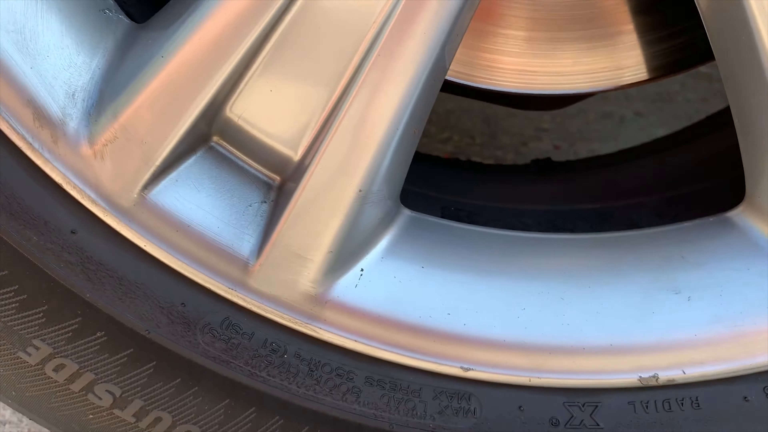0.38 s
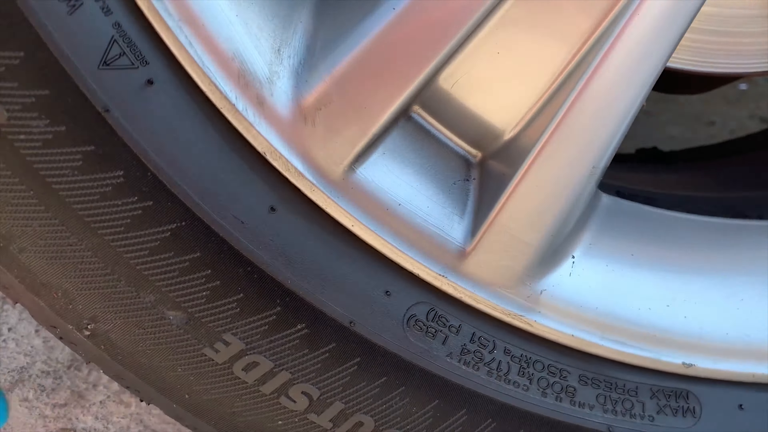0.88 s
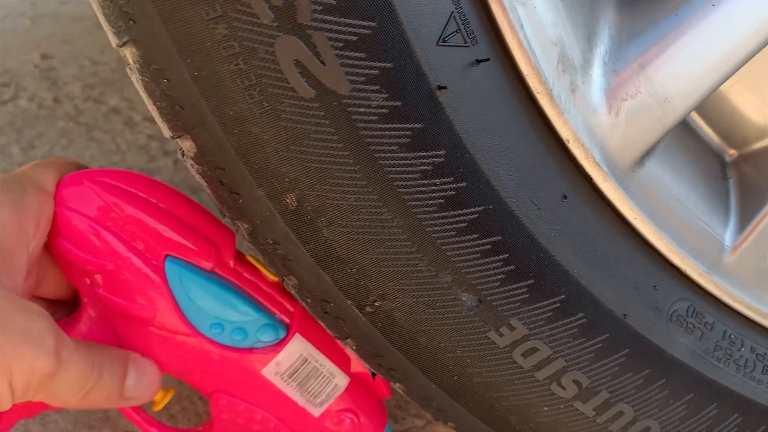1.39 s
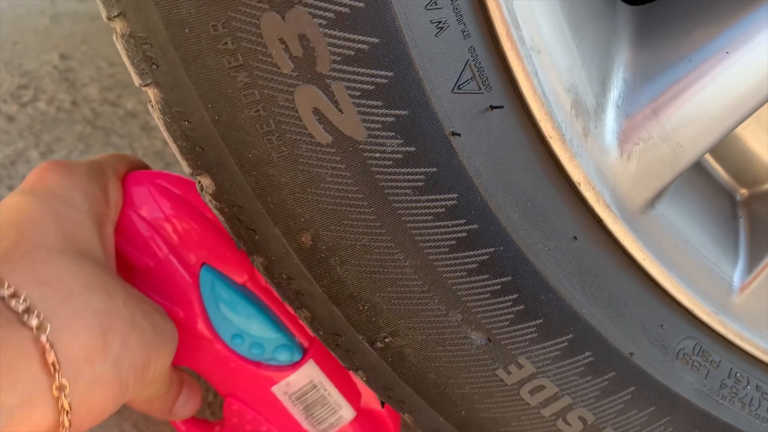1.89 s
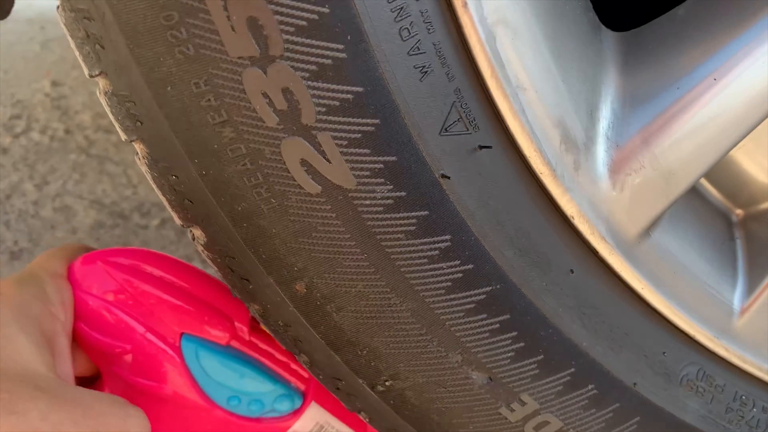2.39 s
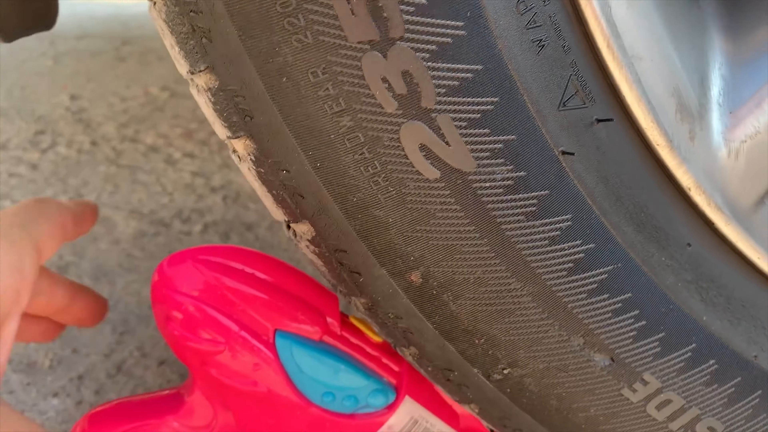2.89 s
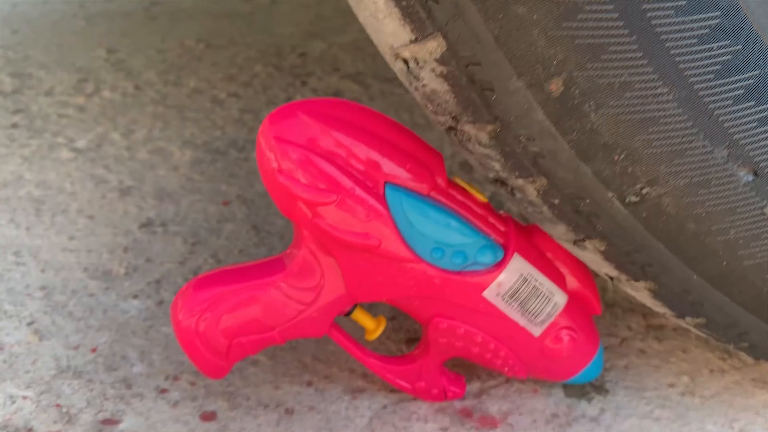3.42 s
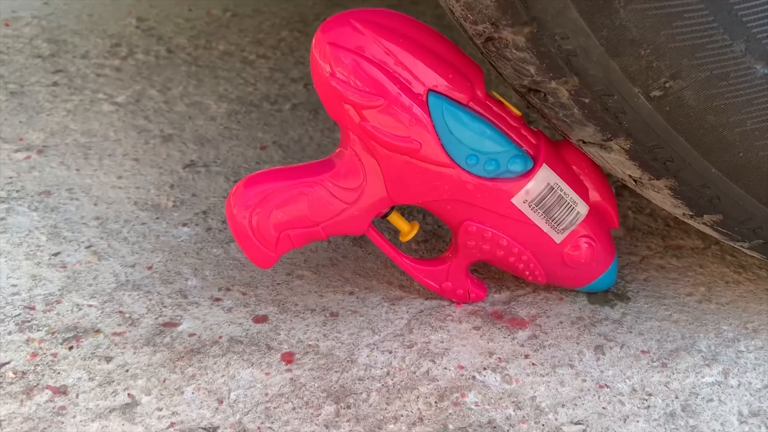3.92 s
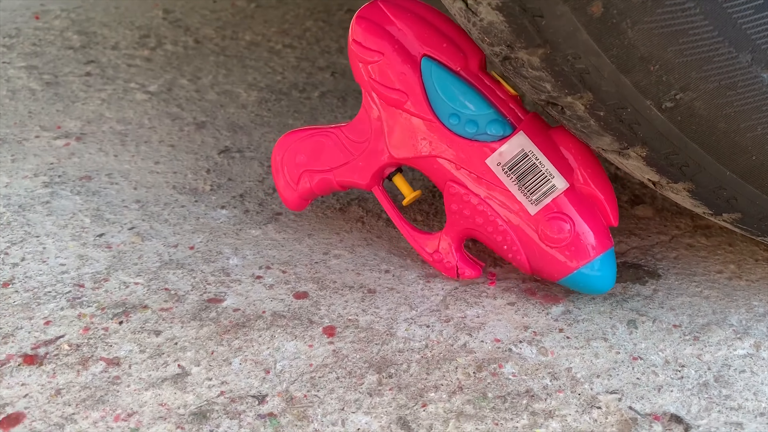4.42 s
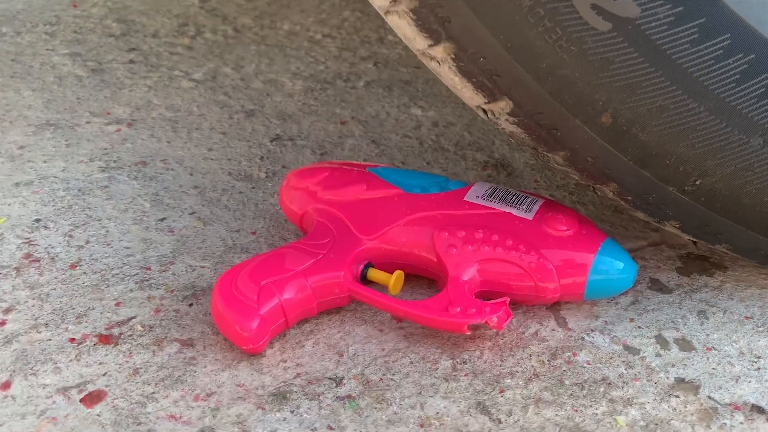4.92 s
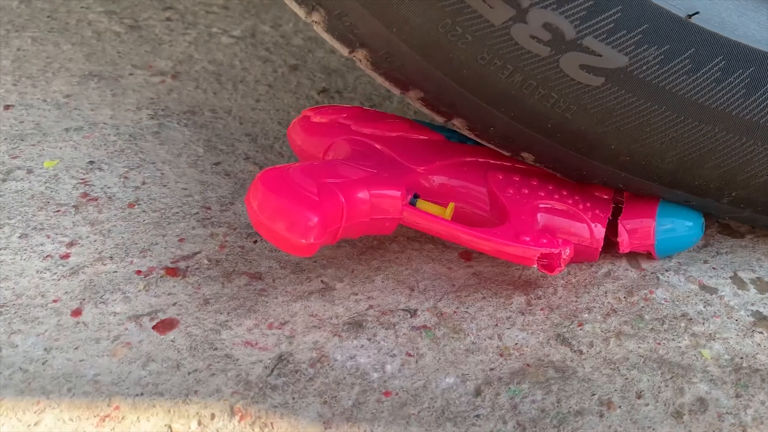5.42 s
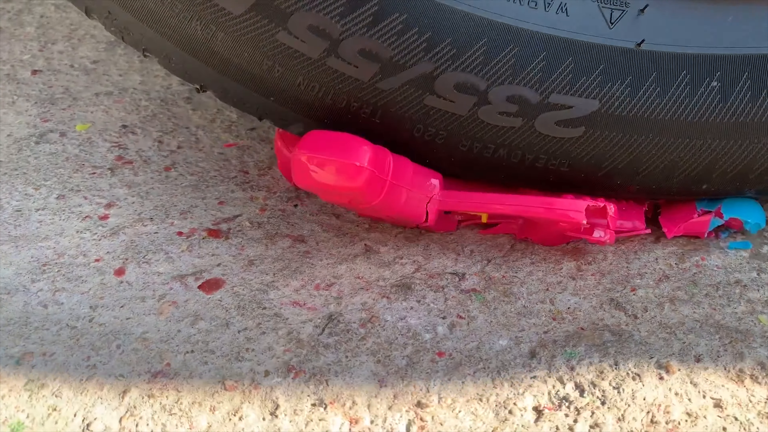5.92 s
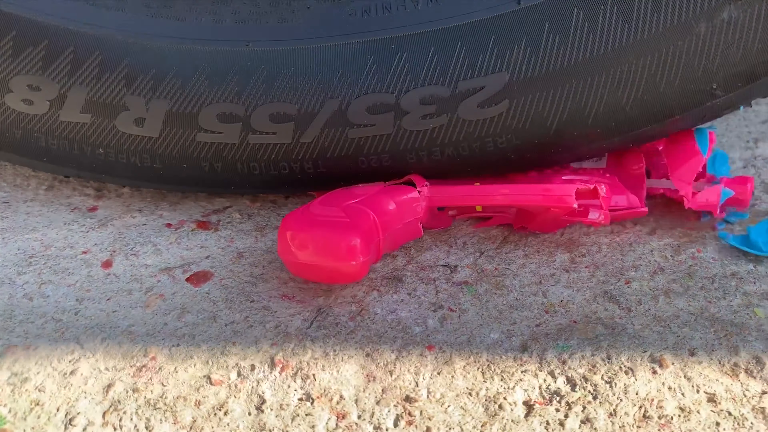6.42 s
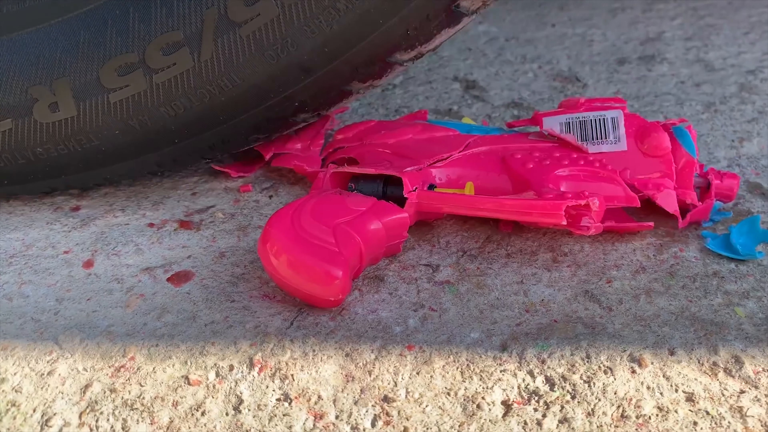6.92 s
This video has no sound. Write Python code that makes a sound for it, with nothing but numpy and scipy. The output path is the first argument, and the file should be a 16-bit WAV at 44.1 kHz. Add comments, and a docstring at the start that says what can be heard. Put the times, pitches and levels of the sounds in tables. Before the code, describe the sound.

A car tyre nudges a hollow hard plastic toy on concrete with sharp cracks, pauses, then rolls over it in a dense crunch.

```python
"""A car idles softly while insects hiss far off. Its tyre pushes a hollow, hard plastic toy over concrete:
the shell slips and cracks, bursts into louder cracks at 1 to 2.4 s, and then lies nearly quiet. From 4 s the
tyre rolls across it with ringing and knocks, then a dense crunch flattens it, thinning out near 7 s.
Shaped noise makes cracks, scrape, rumble and air; sines make shards, chips, knocks, thuds, rings and whines.
Two close microphone ports listen."""
import sys
import numpy as np
from scipy import signal
from scipy.fft import rfft, irfft, next_fast_len
from scipy.io import wavfile
from scipy.ndimage import map_coordinates

SR = 44100
rng = np.random.default_rng(int(sys.argv[2]) if len(sys.argv) > 2 else 0)


def level_to_linear(level):
    """Convert decibel levels to linear amplitude factors, elementwise."""
    exponent = np.asarray(level, float) / 20
    return 10 ** exponent


def file_out(sig):
    """Save sig as 16-bit WAV at sys.argv[1]."""
    # one column per channel
    cols = np.atleast_2d(sig).T
    # limit, then scale
    lim = np.clip(cols, -1, 1)
    pcm = np.round(lim * 32767).astype(np.int16)
    wavfile.write(sys.argv[1], SR, pcm)


N = 311346

# Spectrum of idle and insects. Each row: frequency in Hz, relative level in dB.
AIR_SPECTRUM = [(60, 2), (150, 2.5), (420, -7), (520, -25), (1200, -23), (1800, -30.5), (2500, -12.5),
                (3900, -26), (5000, -5), (6500, -15), (8500, -17), (11000, -41), (16300, -43)]
# Steady whines of the idling car. Each row: frequency in Hz, relative level in dB.
WHINES = [(1270, -65.5), (5001, -61), (15003, -61)]
# Left-right likeness of near and far noise. Each row: frequency in Hz, correlation from 0 to 1.
NEAR_ALIKE = [(30, 0.17), (200, 1), (900, 0.99), (1300, 0.32), (6000, 0.46), (8500, 0.99)]
FAR_ALIKE = [(60, 0.079), (400, 0.98), (1500, 0.15), (6000, 0.15), (9000, 1)]
# How hard the tyre presses the toy along the grit. Each row: time in seconds, grinding level in dB.
PRESSURE = [(0, -33.5), (0.1, -43.5), (0.27, -53.5), (0.32, -63), (2.58, -61), (2.65, -44.5), (2.76, -68),
            (3.7, -60.5), (3.97, -45.5), (4.12, -50.5), (4.35, -47.5), (4.62, -42.5), (5.12, -41),
            (5.19, -58), (5.27, -31.5), (5.8, -30), (6.38, -29), (6.45, -38), (6.75, -57), (7.06, -55)]
# Spectrum of plastic on grit. Each row: frequency in Hz, relative level in dB.
GRIND_SPECTRUM = [(200, -10), (600, 4.5), (2000, 6), (3800, 5), (6500, 7), (9000, 3), (14000, 3.5),
                  (16300, -16)]
# Spectrum of the tyre's rumble. Each row: frequency in Hz, relative level in dB.
RUMBLE_SPECTRUM = [(30, -4.5), (170, -0.5), (208, 4.5), (240, -13.5), (450, -11), (700, -44.5)]
# Thuds of the tyre wall when load lets go. Each row: peak in seconds, relative level in dB, pitch in Hz.
THUDS = [(0.03, -34.5, 51), (1.09, -16, 164.5), (1.229, -28, 189.5), (1.2908, -18, 218), (1.47, -35, 48.3),
         (1.507, -37.5, 90.2), (1.644, -31.5, 53.8), (1.697, -28, 61.4), (1.768, -26.5, 101),
         (2.295, -24.5, 202.4), (1.975, -24.5, 43.7), (2.394, -26.5, 224), (4.018, -30, 91),
         (4.739, -17, 110), (5.28, -29, 50.5), (5.494, -25, 38), (5.513, -22.5, 215), (5.608, -23.5, 211),
         (6.006, -25.5, 204), (6.262, -28, 187), (6.399, -37, 45)]
# Shell and rubber ringing on after a knock or slip.
# Each row: start in seconds, end in seconds, mid pitch in Hz, relative level in dB.
RINGS = [(0.017, 0.124, 585, -34.5), (1.1, 1.227, 186, -25.5), (3.95, 4.08, 174, -37.5),
         (4.05, 4.245, 196.8, -37), (3.994, 4.1, 635, -32.5), (4.332, 4.406, 652, -31),
         (4.404, 4.441, 680, -33.5), (4.508, 4.573, 676, -28), (4.575, 4.693, 683, -32.5),
         (4.597, 4.67, 1088, -27.5), (4.724, 4.83, 112.6, -25), (4.799, 4.904, 636.5, -15),
         (4.913, 4.955, 650, -11), (4.952, 5.037, 619, -17.5), (5.046, 5.09, 555, -17.5),
         (5.078, 5.182, 570, -21), (5.269, 5.326, 417, -25), (5.3, 5.59, 474.5, -33.5),
         (5.466, 5.556, 448, -21), (6.276, 6.36, 1465, -28.5)]
# Modes of such a ring; the scrape's cavity shares the multiples. Each row: pitch multiple, level in dB.
RING_MODES = [(1, 1), (1.65, -21), (3.0, -27)]
# Cracks of the shell. Each row: peak in seconds, relative treble snap in dB, relative body in dB.
CRACKS = [(0.035, -35, -23.5), (0.062, -47, -26.5), (0.1803, -37, -37), (0.2506, -35, -40),
          (1.088, -6, -16), (1.1088, -15, -16), (1.1267, -12.5, -23.5), (1.135, -17.5, -15.5),
          (1.1506, -11.5, -13), (1.162, -10, -14), (1.226, -39, -30), (1.2651, -20, -19), (1.269, -20, -56),
          (1.283, -15, -20), (1.2887, -6.5, -14.5), (1.538, -21.5, -31.5), (1.6893, -38.5, -29.5),
          (1.725, -25, -23), (1.7634, -6.5, -12.5), (1.792, -33, -27), (1.8076, -4.5, -12.5),
          (1.9197, -5, -19.5), (1.9322, -17.5, -25.5), (1.941, -14.5, -11.5), (1.9487, -5.5, -15),
          (2.005, -42, -30), (2.0546, -23, -22), (2.0756, -28, -12), (2.085, -37.5, -26),
          (2.097, -16.5, -23.5), (2.1386, -14.5, -8.5), (2.1527, -29.5, -29), (2.3258, -7.5, -14.5),
          (2.3902, -17.5, -19.5), (2.402, -21, -59), (2.41, -27.5, -48), (2.629, -50, -35.5),
          (2.7167, -45, -41), (3.772, -77, -61), (4.005, -7.5, -13.5), (4.009, -11, -39),
          (4.019, -25.5, -19), (4.144, -75, -44), (4.209, -71, -40), (4.2666, -44, -38), (4.3062, -21, -25),
          (4.3284, -23.5, -22), (4.3381, -12.5, -20.5), (4.4062, -23.5, -31.5), (4.4971, -31, -34),
          (4.51, -25.5, -20), (4.5404, -31, -25.5), (4.561, -29, -29.5), (4.585, -15, -16),
          (4.691, -48, -44), (4.7229, -6, -11), (4.7744, -32, -27), (4.803, -31, -17), (4.8167, -19, -13.5),
          (4.836, -17, -12), (4.912, -32.5, -28), (4.9481, -22.5, -12.5), (4.994, -37.5, -21.5),
          (5.018, -25.5, -17.5), (5.0315, -21, -15.5), (5.0694, -22, -14), (5.0992, -23.5, -17),
          (5.12, -42.5, -29.5), (5.214, -17, -43), (5.234, -28, -22), (5.2496, -7.5, -11),
          (5.2611, -7.5, -11), (5.285, -22.5, -23), (5.2973, -16, -13.5), (5.31, -18.5, -25),
          (5.3236, -15.5, -21), (5.339, -15.5, -28), (5.348, -15.5, -35), (5.377, -12, -36),
          (5.399, -16, -49), (5.4185, -13, -47), (5.432, -15.5, -28), (5.448, -19.5, -53),
          (5.464, -12, -14), (5.471, -13.5, -16), (5.509, -15.5, -15), (5.5187, -13, -17.5),
          (5.5443, -13, -50), (5.563, -11.5, -11), (5.587, -15, -21.5), (5.622, -10, -17.5),
          (5.634, -16.5, -21), (5.6504, -16, -25), (5.6627, -15, -31.5), (5.679, -23.5, -10.5),
          (5.693, -12, -16.5), (5.7145, -12.5, -22), (5.729, -11.5, -19.5), (5.7454, -12.5, -19.5),
          (5.771, -17, -13.5), (5.785, -12.5, -17.5), (5.7911, -15, -57), (5.8108, -13, -26),
          (5.823, -14.5, -12), (5.839, -10.5, -19), (5.852, -18, -18.5), (5.868, -16, -19),
          (5.879, -12, -13), (5.898, -13.5, -14), (5.9307, -8.5, -14), (5.963, -9.5, -16),
          (5.979, -10, -18.5), (6.013, -10.5, -14.5), (6.053, -24.5, -36), (6.073, -6.5, -15),
          (6.1, -12, -19.5), (6.1274, -10.5, -19), (6.1348, -14, -33), (6.157, -10, -12),
          (6.1804, -13, -15.5), (6.2114, -14, -19), (6.2204, -10.5, -20), (6.2876, -8.5, -14.5),
          (6.3308, -13, -23), (6.3376, -9, -17), (6.365, -15.5, -9.5), (6.3788, -20, -12.5),
          (6.403, -21, -31), (6.4217, -12.5, -18), (6.445, -21, -21), (6.4678, -11, -21),
          (6.491, -15, -8.5), (6.502, -14.5, -25.5), (6.5083, -7, -17), (6.5177, -31, -17),
          (6.542, -18.5, -32), (6.553, -11, -13), (6.558, -16, -34), (6.575, -24, -28.5),
          (6.5891, -15.5, -14.5), (6.597, -12.5, -36), (6.6083, -27, -22.5), (6.6205, -18, -16.5),
          (6.646, -30, -45), (6.6658, -14, -17.5), (6.703, -10, -20), (6.7146, -40.5, -19.5),
          (6.733, -19, -20), (6.741, -22.5, -34), (6.7585, -13, -17), (6.7892, -13.5, -15.5),
          (6.807, -26, -28), (6.8378, -29, -16.5), (6.857, -18, -25.5), (6.883, -13.5, -18.5),
          (6.919, -29.5, -23.5), (6.956, -29.5, -32.5), (6.991, -28, -32.5)]
# Bands of a crack. Each row: low edge in Hz, high edge in Hz, typical t60 in seconds, echo over burst in dB.
CRACK_BANDS = [(6410, 13850, 0.012, -23.5), (2660, 3490, 0.038, -12.5), (830, 1600, 0.036, -23.5),
               (233, 1290, 0.043, -23)]
# Knocks of the hollow toy on the ground. Each row: peak in seconds, relative level in dB, cavity pitch in Hz.
KNOCKS = [(0.035, -22.5, 577), (0.079, -22.5, 610), (1.089, -15, 525), (1.112, -19.5, 630),
          (1.152, -15, 584), (1.268, -28.5, 743), (1.297, -19.5, 674), (1.726, -23.5, 650),
          (1.766, -21.5, 650), (1.958, -24, 570), (2.009, -21.5, 681), (2.1, -18, 770), (2.328, -24, 653),
          (3.065, -47, 704), (4.028, -22.5, 640), (4.512, -13, 657), (4.726, -15.5, 613),
          (4.778, -13.5, 620), (4.819, -2.5, 587), (4.92, -7, 617), (4.953, -4, 585), (5.034, -4.5, 540),
          (5.08, -6.5, 570), (5.11, -10, 520), (5.567, -8.5, 650), (5.883, -19.5, 550), (6.096, -16, 740),
          (6.232, -16, 710), (6.367, -16, 627)]
# Modes of the cavity. Each row: pitch multiple, level in dB, t60 in seconds.
CAVITY_MODES = [(1, -2, 0.02), (1.029, -13, 0.05), (1.65, -14, 0.015)]
# How much louder the left port hears the middle range. Each row: time in seconds, lean in dB.
LEAN = [(0, 3.5), (4.2, 6), (5, 9.8), (5.4, 0.63)]
# Where that lean acts. Each row: frequency in Hz, share from 0 to 1.
LEAN_SHAPE = [(350, 0.38), (1300, 1), (2200, 0.24), (5000, 1), (8500, 0.014)]

PORT_LAG_S = 10 / SR
LEAD_S = 0.006  # swell kept ahead of each peak
LUMPS_DB, KNOCK_SCATTER_DB = 4.5, 2
# debris rattling after a crack: level over the crack's body, before its rise
RATTLE_DB, RATTLE_RISE_S, RATTLE_T60_S = -22, 0.0072, 0.25
# chips and snaps gain on the scrape as pressure rises
SNAPS_DB_PER_DB = 0.44
# the tyre shudders after a thud or knock: level over each, before the rise
SHUDDER_THUD_DB, SHUDDER_KNOCK_DB, SHUDDER_RISE_S, SHUDDER_T60_S = -10.5, -32, 0.014, 0.58
# rumble under steady load, before the lumps: level at a pressure of -46.5 dB, growth with pressure
RUMBLE_DB, RUMBLE_DB_PER_DB = -52, 0.6
# base of a crack's rise at a pressure of -52.5 dB; squeezed shell tears more slowly
TEAR_S, TEAR_DB_PER_DB = 0.0003, 0.3
# cavity resonance of the scrape: the dB is what each mode adds to a flat gain of 1
CAVITY_HZ, CAVITY_WIDTH_HZ, CAVITY_DB = 650, 44, 2


def unit(x):
    """Scaled to rms 1."""
    return x / np.sqrt(np.mean(x ** 2) + 1e-20)


def along(points, hz):
    """Interpolates (Hz, value) points on a log axis."""
    f, v = np.transpose(points)
    return np.interp(np.log(hz + 1), np.log(f + 1), v)


def curves(rows):
    """One value per sample for each column after the time."""
    s, *cols = np.transpose(rows)
    return [np.interp(np.arange(N) / SR, s, c) for c in cols]


def wobble(rate_hz):
    """A smooth random curve, rate_hz knots a second."""
    knots = rng.standard_normal(int(N * rate_hz / SR) + 4)
    return map_coordinates(knots, [np.arange(N) * rate_hz / SR])


def filtered(x, response):
    """x times a complex response of frequency."""
    m = next_fast_len(N + 8192)
    return irfft(rfft(x, m) * response(np.fft.rfftfreq(m, 1 / SR)), m)[..., :N]


def pair(gain, alike):
    """Stereo noise of rms 1, coloured by gain(Hz), as alike left and right as the table says."""
    def mid_side(hz):
        turn = np.arccos(np.clip(along(alike, hz), 0, 1)) / 2
        return gain(hz) * [np.cos(turn), np.sin(turn)]

    mid, side = filtered(rng.standard_normal((2, N)), mid_side)
    return unit(np.array([mid + side, mid - side]))


def band(low_hz, high_hz):
    """Gain of a band with soft edges."""
    return lambda hz: 1 / np.sqrt((1 + (low_hz / (hz + 1)) ** 8) * (1 + (hz / high_hz) ** 8))


def blow(length_s, rise_s, t60_s):
    """Time since the peak and an envelope that swells to it exponentially, then dies by 60 dB in t60_s."""
    t = np.arange(round(length_s * SR)) / SR - LEAD_S
    return t, np.where(t < 0, np.exp(t / rise_s), level_to_linear(-60 * t / t60_s))


def add(track, s, sound):
    """Mixes a short sound into a track with its peak at s seconds."""
    part = track[..., max(round((s - LEAD_S) * SR), 0):][..., :sound.shape[-1]]
    part += sound[..., :part.shape[-1]]


def aftermath(events, over_db, rise_s, t60_s):
    """Power left behind by (s, dB) events: it swells briefly and dies by 60 dB in t60_s."""
    s, db = np.transpose(events)
    t = np.arange(2 * SR) / SR
    kicks = np.bincount((s * SR).astype(int), level_to_linear(2 * (db + over_db)), N)
    decay = (1 - np.exp(-t / rise_s)) * level_to_linear(-120 * t / t60_s)
    return abs(signal.fftconvolve(kicks, decay)[:N])


def air():
    """Idle rumble and a far band of insects as noise, with a few thin, slightly unsteady whines."""
    t = np.arange(N) / SR
    whines = np.zeros(N)
    for hz, db in WHINES:
        level = level_to_linear(db - 7.5 + 0.94 * wobble(19))
        whines += level * np.sin(2 * np.pi * hz * t + 0.5 * wobble(42))
    noise = pair(lambda hz: level_to_linear(along(AIR_SPECTRUM, hz)), FAR_ALIKE)
    return level_to_linear(-54.5 + 0.36 * wobble(2.0)) * noise + whines


def chips():
    """Thousands of small pieces flex and ring, 500 a second, each at its own pitch and place; rms 1."""
    when, pitch, size, place = rng.random((round(500 * N / SR), 4)).T
    hz = 350 * 16 ** pitch
    t = np.arange(700) / SR
    decay = level_to_linear(-60 * t * hz[:, None] / 9)  # 60 dB in nine cycles
    ring = np.sin(2 * np.pi * hz[:, None] * t) * decay * (1 - np.exp(-t / 0.00089))
    weight = level_to_linear(along(GRIND_SPECTRUM, hz)) * np.sqrt(hz) * np.minimum(size ** -0.8, 12)
    ring *= weight[:, None]
    index = ((when * N).astype(int)[:, None] + np.arange(len(t))).ravel()
    lean = (2 * place - 1) * pitch  # low pieces reach both ports alike
    ports = [np.bincount(index, (ring * (1 + side * lean)[:, None]).ravel())[:N] for side in (1, -1)]
    return unit(np.array(ports))


def snap_crackle():
    """Noise bursts for bright snaps of very uneven size, at random times."""
    when, size = rng.random((round(160 * N / SR), 2)).T
    snaps = np.bincount((when * N).astype(int), np.minimum(size ** -1.3, 60), N)
    decay = level_to_linear(-120 * np.arange(SR // 20) / SR / 0.013)  # power, t60 13 ms
    power = signal.fftconvolve(snaps, decay)[:N]
    return unit(np.sqrt(abs(power))) * pair(lambda hz: level_to_linear(along(GRIND_SPECTRUM, hz)), NEAR_ALIKE)


def scrape_noise():
    """Dull noise, roughened by grit, that excites the toy's cavity."""
    def gain(hz):
        modes = [1 / (1 + ((hz - k * CAVITY_HZ) / CAVITY_WIDTH_HZ) ** 2) for k, _ in RING_MODES]
        cavity = 1 + level_to_linear(CAVITY_DB) * sum(modes)
        return level_to_linear(along(GRIND_SPECTRUM, hz)) / (hz + 1) ** 0.72 * cavity

    grit = unit(level_to_linear(4.5 * wobble(90) + 2.5 * wobble(11)))
    return grit * pair(gain, NEAR_ALIKE)


def grinding():
    """Plastic dragged and squeezed on grit: scrape, chips and snaps follow pressure and rattling debris."""
    bodies = [(s, body_db) for s, _, body_db in CRACKS]
    rattle = aftermath(bodies, RATTLE_DB, RATTLE_RISE_S, RATTLE_T60_S)
    pressure_db, = curves(PRESSURE)
    pieces = level_to_linear(-5.5) * chips() + level_to_linear(-1.0) * snap_crackle()
    pieces *= level_to_linear(SNAPS_DB_PER_DB * (pressure_db + 29.5))
    return np.sqrt(level_to_linear(2 * pressure_db) + rattle) * (level_to_linear(-2.5) * scrape_noise() + pieces)


def tyre():
    """The rubber wall thuds as decaying sines, and rumbles as noise in lumps under shifting load."""
    thuds = np.zeros(N)
    for s, db, hz in THUDS:
        t, shape = blow(0.25, 0.06 / hz, min(5.85 / hz, 0.09))
        add(thuds, s - min(0.057 / hz, 0.003), level_to_linear(db + 8.5) * shape * -np.sin(2 * np.pi * hz * t))
    pressure_db, = curves(PRESSURE)
    steady = level_to_linear(2 * (RUMBLE_DB + RUMBLE_DB_PER_DB * (pressure_db + 46.5)))
    blows = [(s, db + SHUDDER_THUD_DB) for s, db, _ in THUDS]
    blows += [(s, db + SHUDDER_KNOCK_DB) for s, db, _ in KNOCKS]
    shudder = aftermath(blows, 0, SHUDDER_RISE_S, SHUDDER_T60_S)
    lumps = np.sqrt(steady + shudder) * level_to_linear(LUMPS_DB * wobble(18))
    return thuds + lumps * pair(lambda hz: level_to_linear(along(RUMBLE_SPECTRUM, hz)), NEAR_ALIKE)


def ringing():
    """Shell and rubber ring on after a knock or slip, fading in rough throbs; pitch sags as they die away."""
    out = np.zeros(N)
    throbs = [0.9 + 0.7 * (wobble(190) + 1j * wobble(190)) for _ in RING_MODES]
    for start, end, hz, db in RINGS:
        span = slice(round(start * SR), round(end * SR))
        u = np.linspace(0, 1, span.stop - span.start)
        attack = np.minimum(u * (end - start) / 0.004, 1)
        envelope = attack * level_to_linear(-20 * u) * np.minimum(8 * (1 - u), 1)
        turns = np.cumsum(hz * (1 + 0.03 * (0.5 - u))) / SR
        for throb, (k, mode_db) in zip(throbs, RING_MODES):
            ring = np.real(throb[span] * np.exp(2j * np.pi * k * turns))
            out[span] += level_to_linear(db + mode_db) * envelope * ring
    return out


def cracks():
    """Each crack is a noise burst that dies first in the treble; the freed shard rings at its own pitches."""
    luck = rng.standard_normal((len(CRACKS), 9))
    power, shards = np.zeros((len(CRACK_BANDS), N)), np.zeros(N)
    pressure_db, = curves(PRESSURE)
    for (s, snap_db, body_db), (life, rise, tilt, chunk, *pitch) in zip(CRACKS, luck):
        colour_db = 3.5 * np.array([0, tilt, -tilt, chunk])
        levels_db = colour_db + [snap_db, body_db - 6.5, body_db - 21.5, body_db - 15.5]
        rise_spread, life_spread = np.exp([0.5, 0.35] * np.tanh([rise, life]))
        tear_s = TEAR_S * level_to_linear(TEAR_DB_PER_DB * (pressure_db[round(s * SR)] + 52.5)) * rise_spread
        for track, db, (_, _, t60_s, echo_db) in zip(power, levels_db, CRACK_BANDS):
            t, shape = blow(0.1, min(tear_s + t60_s / 70, LEAD_S / 3), t60_s * life_spread)
            echo = level_to_linear(echo_db - 60 * t / 0.11) * (t > 0)  # from under the car
            add(track, s + t60_s / 60, level_to_linear(2 * db - 1.5) * (shape ** 2 + echo ** 2))
        pitch_spread = np.exp([0.25, 0.091, 0.17, 0.07, 0.038] * np.array(pitch))
        shard_hz = [1863, 3345, 4630, 8350, 13970] * pitch_spread
        for db, hz in zip([body_db] * 3 + [snap_db] * 2, shard_hz):
            t, shape = blow(0.058, min(tear_s, LEAD_S / 4), 0.006 + 60 / hz)
            add(shards, s, level_to_linear(db - 10) * shape * np.sin(2 * np.pi * min(hz, 16000) * t))
    stutter = unit(level_to_linear(3 * wobble(600)))  # the tear runs in jerks
    bursts = np.zeros((2, N))
    for p, (low_hz, high_hz, *_) in zip(power, CRACK_BANDS):
        bursts += stutter * np.sqrt(p) * pair(band(low_hz, high_hz), NEAR_ALIKE)
    return bursts + shards


def hollow_knocks():
    """The air inside the toy rings in a few short modes at every knock."""
    out = np.zeros(N)
    luck = rng.standard_normal((len(KNOCKS), len(CAVITY_MODES)))
    for (s, db, hz), scatter in zip(KNOCKS, luck):
        for (k, mode_db, t60_s), e in zip(CAVITY_MODES, scatter):
            t, shape = blow(0.2, 0.0012, t60_s)
            level = level_to_linear(db + mode_db + KNOCK_SCATTER_DB * e)
            add(out, s, level * shape * -np.cos(2 * np.pi * hz * k * t))
    return out


def scene():
    """All sources, as they reach the two ports."""
    return air() + grinding() + tyre() + ringing() + cracks() + hollow_knocks()


def band_limit(x):
    """A steep low-pass at the top of the band."""
    return signal.sosfilt(signal.butter(12, 16770, fs=SR, output="sos"), x)


def record(dry):
    """The left port is louder in the middle range and late in the treble; peaks round off softly."""
    middle = filtered(dry, lambda hz: np.clip(along(LEAN_SHAPE, hz), 0, 1))
    lean_db, = curves(LEAN)
    x = dry + (level_to_linear(lean_db * [[0.5], [-0.5]]) - 1) * middle

    def ports(hz):
        late_rad = along([(1200, 0.74), (3000, 1)], hz) * (2 * np.pi * hz * PORT_LAG_S - 0.45)
        favour_db = along([(750, 0), (1200, 1.5), (2600, 0.079)], hz)  # up on the left, down on the right
        return (hz < 16500) * np.exp((np.log(level_to_linear(favour_db)) - 0.5j * late_rad) * [[1], [-1]])

    x = filtered(x, ports)
    mix = x / (1 + abs(x) ** 6) ** (1 / 6)
    return band_limit(mix)


dry = scene()
out = record(dry)
file_out(out)
```